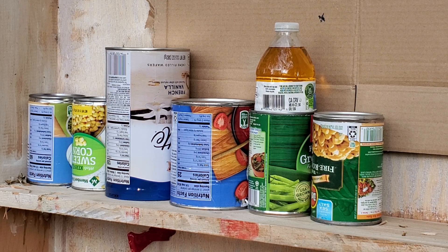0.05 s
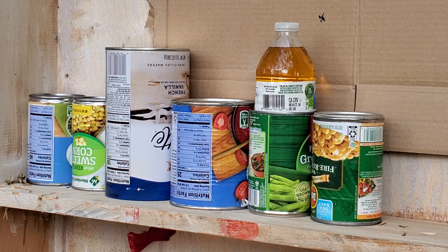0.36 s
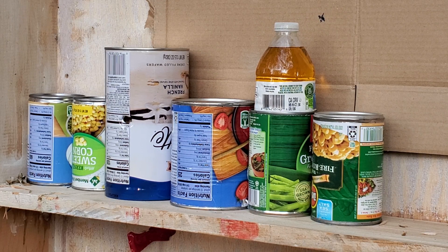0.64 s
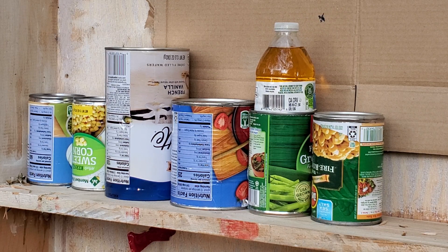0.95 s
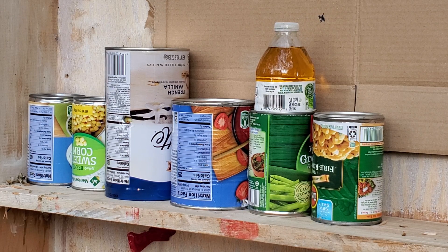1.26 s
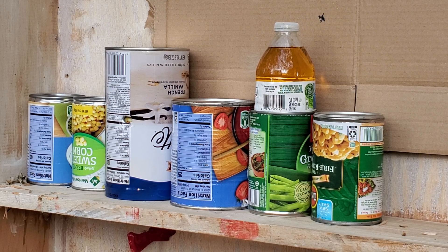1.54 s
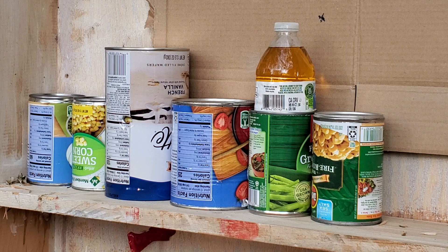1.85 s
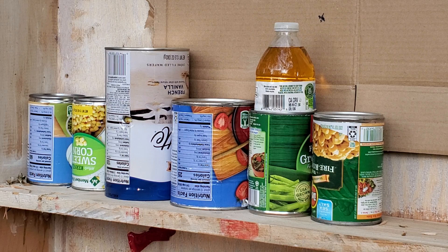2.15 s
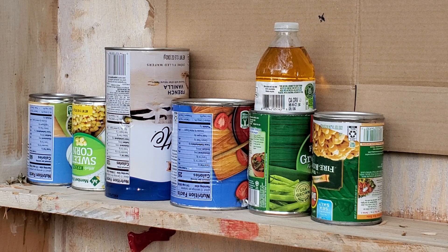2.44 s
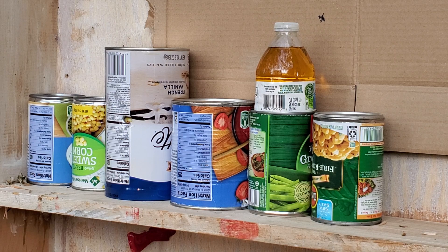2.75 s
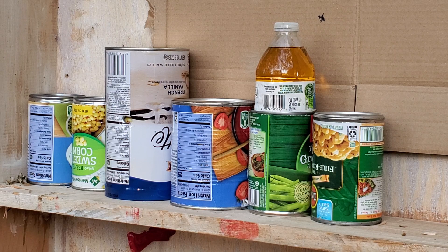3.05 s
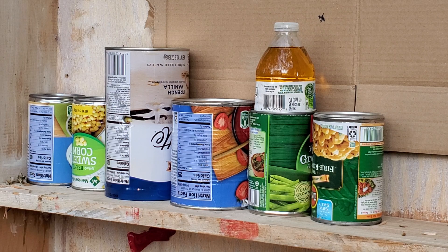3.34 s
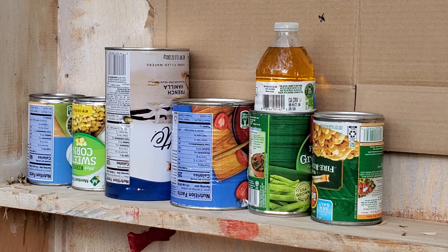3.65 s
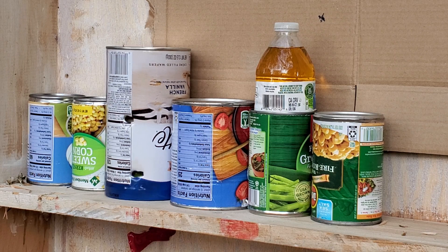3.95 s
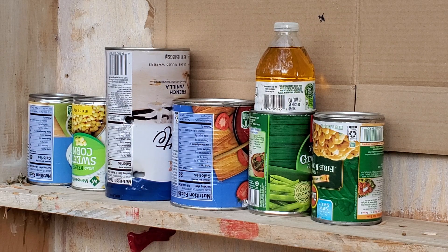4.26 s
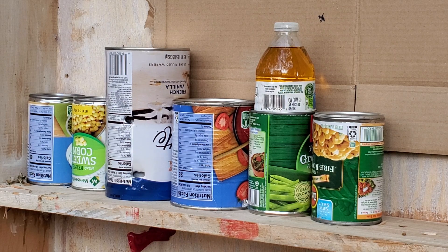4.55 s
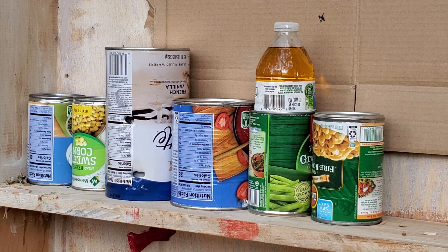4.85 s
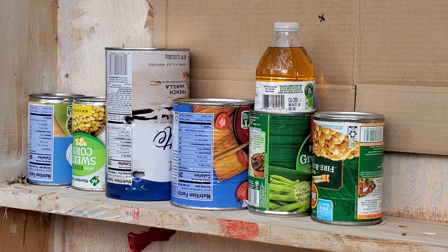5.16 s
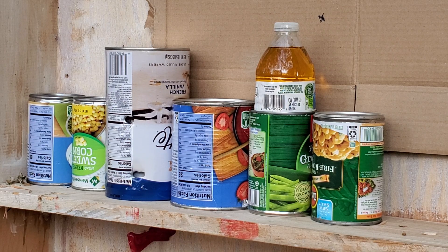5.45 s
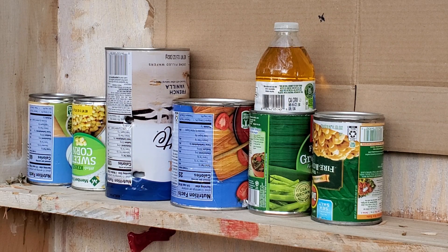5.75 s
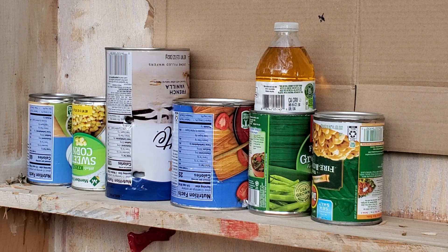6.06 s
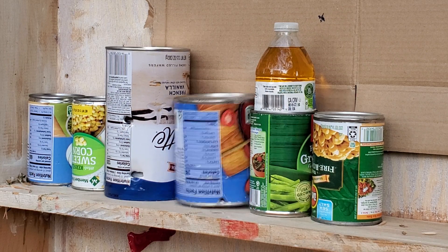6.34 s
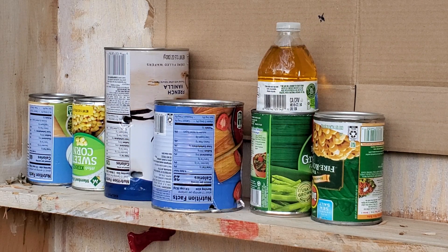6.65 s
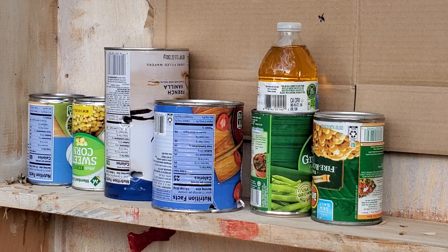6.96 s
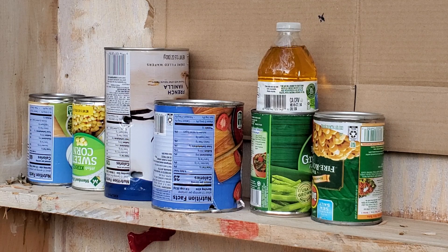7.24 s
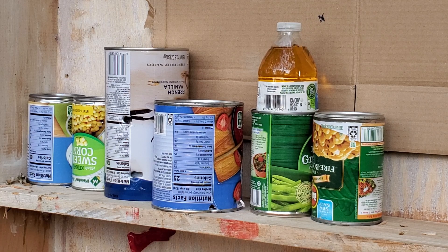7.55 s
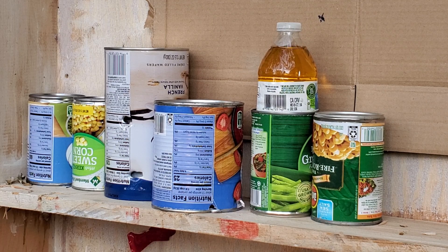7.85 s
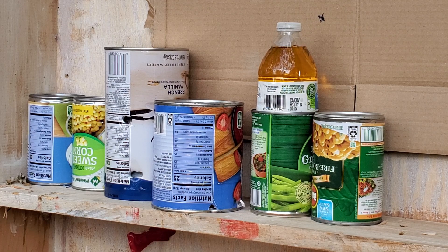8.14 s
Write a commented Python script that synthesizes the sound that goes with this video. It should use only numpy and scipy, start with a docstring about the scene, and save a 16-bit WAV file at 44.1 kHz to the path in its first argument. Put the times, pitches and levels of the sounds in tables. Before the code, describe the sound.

Pellets from an air pistol crack into metal cans three times, each hit ringing and echoing briefly, with faint traffic far away.

```python
"""Air pistol and tin cans

Three pellets hit tin cans on a wooden shelf outdoors, heard from close to the cans. Each puff of gas
arrives just ahead of its slower pellet, which zips past, cracks into a can and shakes the shelf.
Cans ring and rock, the surroundings echo, debris ticks and distant traffic drones.
Each shot ducks the recorder's gain, and the traffic creeps back up until the next."""
import sys
import numpy as np
from scipy import signal
from scipy.fft import rfft, irfft
from scipy.io import wavfile
from scipy.ndimage import uniform_filter1d

SR = 44100
rng = np.random.default_rng(int(sys.argv[2]) if len(sys.argv) > 2 else 0)


def dump_mix(stems):
    """Bounce the given channels to the path in sys.argv[1] as a 16-bit WAV at rate SR."""
    frames = np.atleast_2d(stems).T  # one column per channel
    limited = np.clip(frames, -1, 1)  # hard clip at full scale
    pcm = np.round(limited * 32767).astype(np.int16)
    wavfile.write(sys.argv[1], SR, pcm)


N = 370440


def amp(db):
    """Decibels to gain."""
    return 10 ** (np.asarray(db) / 20)


def unit_rms(x):
    """Scales to rms 1."""
    return x / np.sqrt(np.mean(x ** 2) + 1e-20)


def read(points, hz):
    """Reads a curve along a log-frequency axis."""
    f, value = np.transpose(points)
    return np.interp(np.log(hz + 1), np.log(f + 1), value)


def add(mix, s, sound):
    """Mixes a stereo sound in at s seconds."""
    part = mix[:, round(s * SR):][:, :sound.shape[1]]
    part += sound[:, :part.shape[1]]


def clock(size):
    """Sample times in seconds."""
    return np.arange(size) / SR


def wander(t, knots):
    """A modulator gliding between random values."""
    return np.interp(t, np.linspace(0, t[-1], knots), rng.standard_normal(knots))


def hump(centre_hz, q):
    """The colour of one broad resonance."""
    return lambda hz: -10 * np.log10(1 + (q * ((hz + 1) / centre_hz - centre_hz / (hz + 1))) ** 2)


def ribbed(spectrum, depth_db, spacing_hz):
    """A colour ribbed by chance resonances, shallower in the top octave."""
    knots = np.arange(1024) * spacing_hz
    taper = np.interp(knots, [0, 500, 7000, 10000], [0, 1, 1, .5])
    ribs = depth_db * rng.uniform(-1, 1, len(knots)) * taper
    return lambda hz: read(spectrum, hz) + np.interp(hz, knots, ribs)


def band_decay(x, t60s):
    """Lets each band die away at its own speed."""
    hz, t, bands = signal.stft(x, SR, nperseg=256)
    fade = amp(-60 * t / read(t60s, hz)[:, None])
    return signal.istft(bands * fade, SR, nperseg=256)[1][:, :x.shape[1]]


# stereo image of sounds in front: f/Hz, left-right correlation
AHEAD = [(50, 0), (300, 1), (900, 1), (1600, .5), (3000, .2), (5000, 0.14), (16000, .05)]
def noise(colour, image, size):
    """Stereo noise of rms 1; colour(hz) is its spectrum in dB."""
    hz = np.fft.rfftfreq(size, 1 / SR)
    a, b = np.exp(2j * np.pi * rng.random((2, len(hz))))
    correlation = np.clip(read(image, hz), -.99, .99)
    mid, side = a * np.sqrt(1 + correlation), b * np.sqrt(1 - correlation)
    return unit_rms(irfft(np.array([mid + side, mid - side]) * amp(colour(hz)), size))


def ring(modes, rise, longest_t60=.36):
    """Fluttering modes with a capped decay time; the higher ones reach the two ears out of step."""
    t = clock(65536)
    out = np.zeros((2, len(t)))
    for hz, db, t60 in modes:
        flutter = wander(t, knots=64)
        skew = np.arccos(np.clip(read(AHEAD, hz), -1, 1)) * rng.choice([-1, 1])
        phase = 2 * np.pi * (rng.random() + hz * t) + flutter / 2
        out += amp(db - 60 * t / min(t60, longest_t60)) * np.sin(phase + np.array([[0], [skew]]))
    return out * (1 - np.exp(-t / rise))


def engine(hz, gain, overtone_db, waver=.003, throb_db=1.97):
    """A far exhaust note with a weak octave, unsteady in pitch and strength."""
    t = clock(N)
    pitch = hz * (1 + waver * wander(t, knots=200))
    level = gain * amp(throb_db * wander(t, knots=200))
    phase = 2 * np.pi * np.cumsum(pitch) / SR
    return level * unit_rms(np.sin(phase) + amp(overtone_db) * np.sin(2 * phase))


# tyre rumble: f/Hz, level/dB
TYRES = [(20, -10.5), (45, -2.5), (70, 0), (105, -7.5), (200, -4.5), (300, -9.5), (520, -16), (950, -13),
         (1400, -20), (2200, -33), (3500, -39), (6500, -41), (8400, -59.5), (14000, -48)]
# stereo image of the far road: f/Hz, left-right correlation
AROUND = [(25, 0), (60, .8), (200, 1), (500, 0.093), (1000, 0.063), (2000, .1), (5000, 0)]
# an engine pulls, changes up and slowly loses speed: t/s, f/Hz, level/dB
DRIVING = [(0, 114.3, -36.5), (.5, 123, -35), (0.999, 127.5, -35.5), (1.3, 114, -47.5), (1.9, 87, -42.5),
           (2.7, 91.32, -40.5), (3.9, 88.3, -40.5), (4.7, 82.65, -41), (6.3, 76.43, -41),
           (7.4, 72.22, -54.5), (8.4, 63, -44.5)]
def traffic(recede_s=4, pass_s=4.1, pass_width_s=.62, climb_hz_per_s=14):
    """A bed of tyre noise and three far engines: one recedes, one changes gear, one speeds past."""
    t = clock(N)
    s, hz, db = np.transpose(DRIVING)
    tyres = amp(-46) * noise(lambda hz: read(TYRES, hz), AROUND, N)
    receding = engine(hz=74.8, gain=amp(-36) / (1 + t / recede_s), overtone_db=-21.5)
    driving = engine(np.interp(t, s, hz), amp(np.interp(t, s, db)), overtone_db=-15)
    nearness = np.exp(-((t - pass_s) / pass_width_s) ** 2)
    passing = engine(183 + climb_hz_per_s * (t - pass_s), amp(-42) * nearness, overtone_db=-17)
    return tyres + receding + driving + passing


# debris spots: t/s, level/dB, left over right/dB, top-end EQ/dB
TICKS = [(1.7237, -50, 0, 3), (4.3084, -43, -6, 22), (4.3687, -50, -1.5, 20), (7.0307, -48, -2.0, 8),
         (7.098, -56, -1.0, 6), (7.207, -51.5, -12, 14)]
def debris(mix, t60=0.061):
    """Bits of debris make tiny bright taps."""
    t = clock(4096)
    for s, db, pan_db, top_db in TICKS:
        colour = [(1500, 7), (6500, 12.0), (9500, -9), (15500, top_db)]
        tap = noise(lambda hz: read(colour, hz), AHEAD, len(t)) * amp(db - 60 * t / t60)
        add(mix, s, tap * amp([[pan_db / 2], [-pan_db / 2]]))


# colour of the outdoor tail: f/Hz, level/dB
ECHO = [(60, -10), (250, -1), (500, -4.5), (800, -1.5), (1500, -9.5), (2800, -2), (5000, -8), (6800, -9),
        (8000, -18.5), (10500, -21), (16000, -20)]
# its decay: f/Hz, t60/s
ECHO_T60 = [(100, 1.0), (700, 0.93), (2500, 1.037), (5000, 0.9), (9000, 0.58), (15000, .42)]
def echo(rise=0.13, uneven_db=1):
    """The surroundings scatter the shot back in uneven waves; the air takes the treble first."""
    t = clock(65536)
    waves = wander(t, knots=60)
    colour = ribbed(ECHO, depth_db=5, spacing_hz=40)
    tail = band_decay(noise(colour, AHEAD, len(t)), ECHO_T60)
    return tail * amp(uneven_db * waves) * (1 - np.exp(-t / rise))


def thud(centre_hz=92, rise=0.0044, t60=0.18):
    """The whole shelf is pushed and gives the hit its low end."""
    t = clock(16384)
    colour = lambda hz: 2 * hump(centre_hz, q=1.2)(hz)
    return noise(colour, AHEAD, len(t)) * amp(-60 * t / t60) * (1 - np.exp(-t / rise))


# woody shelf modes: f/Hz, level/dB, t60 before the cap/s
SHELF = [(169.3, 1, 0.2), (248, -4, 0.44), (392, -8.5, 1), (531, -9.5, 0.33), (952, -13.5, 0.12)]
def shelf_ring():
    """The shaken shelf rings in its low modes."""
    return ring(SHELF, rise=0.0095)


def knock(centre_hz, t60, dull_hz=2400, rise=0.00027):
    """A dull, quickly damped blow on the shelf."""
    t = clock(8192)
    colour = lambda hz: hump(centre_hz, q=2.2)(hz) - 10 * np.log10(1 + (hz / dull_hz) ** 6)
    return noise(colour, AHEAD, len(t)) * amp(-60 * t / t60) * (1 - np.exp(-t / rise))


# the wide can's rim modes: f/Hz, level/dB, t60/s
WIDE_RIM = [(348.4, -1.5, 0.22), (377.5, -2.5, 0.17), (738, -1.5, 0.13)]
# runs of knocks: t/s, level/dB, f/Hz, t60/s, first gap/s, step per knock/dB, relative clack/dB, rim on
ROCKS = [(.571, -6.5, 700, 0.093, .012, -4.5, -15, False), (.828, -13, 480, .1, .054, -13.5, -3, False),
         (4.026, -1.5, 880, 0.051, 0.0197, -10, -12, False),
         (4.088, -9.5, 760, 0.075, 0.042, -7.5, -10, False), (6.421, -5, 450, 0.084, .022, -3.5, 7, False),
         (6.483, -7, 630, 0.11, .039, -5, -5, True), (6.597, -26, 443, .1, 0.073, -10, -8, True)]
def rocking_cans(mix, gap_ratio=0.69, pitch_ratio=0.56, knocks=4):
    """Cans rock to rest on the wood with a tinny clack, each knock sooner, softer and duller."""
    for start, db, centre_hz, t60, gap, step_db, clack_db, rim_rings in ROCKS:
        run, s = np.zeros((2, SR)), 0
        for k in range(knocks):
            force = amp(k * step_db)
            add(run, s, force * knock(centre_hz * pitch_ratio ** k, t60))
            add(run, s, force ** 2 * amp(clack_db) * knock(centre_hz=1651.1, t60=.04))
            if rim_rings:
                add(run, s, force * amp(-1.5) * ring(WIDE_RIM, rise=0.0036))
            s += gap * gap_ratio ** k
        add(mix, start, amp(db) * run)


# colour of the rattle: f/Hz, level/dB
RATTLE = [(30, -18), (90, -3), (180, -0.5), (300, -1), (600, -3), (1300, -3.5), (2000, -9), (3200, -6),
          (6700, -12.5), (8200, -17.5), (10000, -21), (13000, -13.5), (16000, -13.5)]
# its decay: f/Hz, t60/s
RATTLE_T60 = [(100, 0.51), (400, 0.18), (1200, 0.22), (3000, .3), (7000, 0.36), (15000, 0.3)]
def rattle(rise=0.0054):
    """The dense ringing of cans, boards and cardboard after the blow."""
    t = clock(32768)
    colour = ribbed(RATTLE, depth_db=8, spacing_hz=40)
    return band_decay(noise(colour, AHEAD, len(t)), RATTLE_T60) * (1 - np.exp(-t / rise))


# modes of the tall can and the wide can: f/Hz, level/dB, t60 before the cap/s
TALL_WALL = [(1262, 1.5, 0.25), (1670, -14, 1.1), (2060, -10, 0.43), (2390, -13, 0.19), (2961, -9.5, 0.69),
             (3770, -15, 0.84), (3470, -22, 1.2), (4170, -13, 0.23), (5760, -19, 0.25), (6250, -9, 0.49)]
TALL_BASE = [(1104.4, -9, 0.24), (1257, -2, 0.91), (1750, -11.5, 0.59), (2237, -6, 0.93),
             (2734, -5.5, 0.39), (2990, -1.5, 0.16), (3560, -1, 0.49), (4980, -2, 0.16), (5470, -7, 0.99),
             (6480, -8, 0.96), (6500, -9.5, 0.41)]
TALL_LID = [(657, -6, .9), (694, -6, 1.1), (738, -3.5, 1.8), (1179, -4.5, .9), (1281, -6.5, 1)]
WIDE_WALL = [(987, -3.5, 0.3), (1270, -13.5, 0.28), (1320, -25.5, 0.6), (1640, -5.5, 0.38),
             (2040, -16, 0.31), (2130, -7, 0.27), (2630, -7.5, 0.31), (3240, -13.5, 0.35),
             (3370, -4, 0.046), (4850, -18.5, 0.32)]
WIDE_LID = [(657, -4, .8), (694, -4, 1.2), (738, -5, 1.1), (802, -2, .8), (848, -3, .7), (1157, 3, .6),
            (1355, 5, .6)]
# can hits: t/s, body level/dB, body modes, lid level/dB, lid modes
CLANGS = [(0.566, -4.5, TALL_WALL, -40, TALL_LID), (4.019, -8, TALL_BASE, -21.5, TALL_LID),
          (6.425, -2, WIDE_WALL, -24, WIDE_LID)]
def struck_cans(mix):
    """The tin clangs: paper labels damp the walls, while the bare lids ring on."""
    for s, body_db, body, lid_db, lid in CLANGS:
        add(mix, s, amp(body_db) * ring(body, rise=0.0061))
        add(mix, s, amp(lid_db) * ring(lid, rise=.003, longest_t60=2.2))


# colour of the gas puff: f/Hz, level/dB
REPORT = [(60, -10), (180, -1), (600, -8.5), (1200, -1), (3000, -5), (6500, -7), (8000, -16.5),
          (10500, -22.5), (13000, -11), (16000, -10)]
# its stereo image, from the side: f/Hz, left-right correlation
ASIDE = [(100, .7), (400, .5), (850, -0.6), (1400, -.2), (2300, .3), (5000, -0.15)]
def report(swell=0.025, t60=0.27, bounce_db=-10, bounce_delay=0.1):
    """The puff of gas swells, fades and grows duller, and comes back once from a wall."""
    t = clock(16384)
    onset = lambda u: np.clip(u / swell, 0, 1) ** 2.8
    puff = lambda u: onset(u) * amp(-60 * np.maximum(u - swell, 0) / t60)
    envelope = np.hypot(puff(t), amp(bounce_db) * puff(t - bounce_delay))
    hiss = noise(ribbed(REPORT, depth_db=7, spacing_hz=90), ASIDE, len(t))
    return envelope * band_decay(hiss, t60s=[(5000, 3.4), (9000, 1), (15000, .7)])


def surges(centre_hz, count=3, gap_s=.0085, first_length_s=.008, shrink=0.69, step_db=-2.5):
    """The report's quick run of hissing crests, each shorter and weaker than the last."""
    t = clock(1024)
    out = np.zeros((2, 4096))
    for k in range(count):
        hiss = noise(hump(centre_hz, q=4.5), ASIDE, len(t))
        progress = np.minimum(t / (first_length_s * shrink ** k), 1)
        crest = np.sqrt(np.sin(np.pi * progress).clip(0))
        add(out, k * gap_s, amp(k * step_db) * hiss * crest)
    return out


def zip_past(from_hz=16000, to_hz=11800, length=0.0047):
    """The pellet's whistle drops in pitch as it passes."""
    progress = np.minimum(clock(512) / length, 1)
    turns = np.cumsum(to_hz + (from_hz - to_hz) * (1 - progress) ** 2) / SR
    return np.sin(np.pi * progress) * np.sin(2 * np.pi * (turns + rng.random((2, 1))))


def crack(centre_hz, hold=0.0027, t60=0.077, snap_db=-4, snap_t60=0.075):
    """The pellet snaps against the tin and tears through it."""
    t = clock(4096)
    tear = noise(hump(centre_hz, q=1.6), AHEAD, len(t)) * amp(-60 * np.maximum(t - hold, 0) / t60)
    snap = noise(lambda hz: read(REPORT, hz), AHEAD, len(t)) * amp(snap_db - 60 * t / snap_t60)
    return tear + snap


# shot cues: impact t/s, report lead/s, report level/dB, surge level/dB, surge f/Hz, crack level/dB,
# crack f/Hz, rattle level/dB, shelf level/dB, thud level/dB, echo level/dB
SHOTS = [(0.562, 0.042, -3.5, 1.5, 4683, 0, 2600, 2, -4.5, -18, -12.5),
         (4.0162, 0.039, -5, -14, 4420, 0.5, 2774, 1, -4, -14, -15.5),
         (6.417, .044, -5.5, -8, 2995, -0.5, 2200, -0.5, -6, -6, -14.5)]
def pistol_shots(mix, surge_lead=.0238, zip_lead=.008, shelf_lag=.006):
    """Sound outruns the pellet, so each report comes before its impact."""
    for (s, report_lead, report_db, surge_db, surge_hz, crack_db, crack_hz,
         rattle_db, shelf_db, thud_db, echo_db) in SHOTS:
        add(mix, s - report_lead, amp(report_db) * report())
        add(mix, s - surge_lead, amp(surge_db) * surges(surge_hz))
        add(mix, s - zip_lead, amp(-9) * zip_past())
        add(mix, s, amp(crack_db) * crack(crack_hz))
        add(mix, s, amp(rattle_db) * rattle())
        add(mix, s + shelf_lag, amp(shelf_db) * shelf_ring())
        add(mix, s, amp(thud_db) * thud())
        add(mix, s, amp(echo_db) * echo())


def scene():
    """Shots, cans and debris layered over the traffic bed."""
    mix = traffic()
    pistol_shots(mix)
    struck_cans(mix)
    rocking_cans(mix)
    debris(mix)
    return mix


def gain_control(x, limit_db=-10.5, recover_db_per_s=2.5):
    """Ducks the gain at once by any excess over the limit, and lets it creep back."""
    power = uniform_filter1d((x ** 2).mean(0), size=400)
    excess_db = np.maximum(10 * np.log10(abs(power) + 1e-12) - limit_db, 0)
    recovery = recover_db_per_s * clock(N)
    cut_db = np.maximum.accumulate(excess_db + recovery) - recovery
    return x * amp(-uniform_filter1d(cut_db, size=100))


def record(dry):
    """Two microphone ports of slightly different colour, then ducking, soft clipping and a high cut."""
    ceiling, high_cut_hz = .93, 16150
    balance = [(100, -1), (1500, 0.1), (4200, -2.5), (8000, -0.5), (13000, 2.0)]
    balance_db = read(balance, np.fft.rfftfreq(N, 1 / SR))
    ports = irfft(rfft(dry) * amp([balance_db / 2, -balance_db / 2]), N)
    rounded = ceiling * np.tanh(gain_control(ports) / ceiling)
    high_cut = signal.firwin(511, high_cut_hz, window=("kaiser", 9), fs=SR)
    return signal.oaconvolve(rounded, high_cut[None], "same")


dry = scene()
out = record(dry)
dump_mix(out)
```